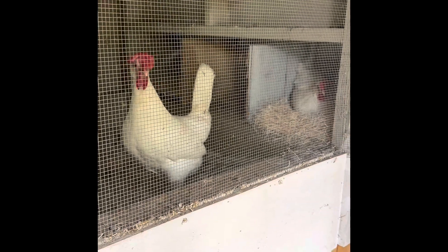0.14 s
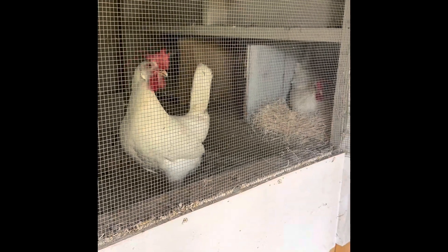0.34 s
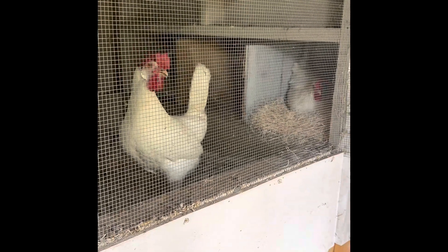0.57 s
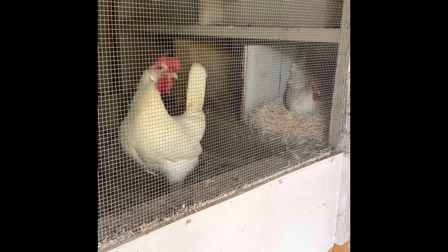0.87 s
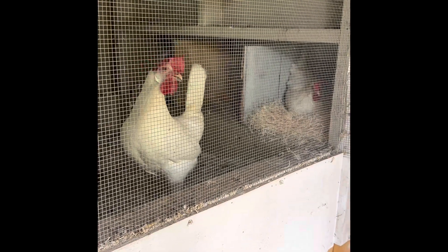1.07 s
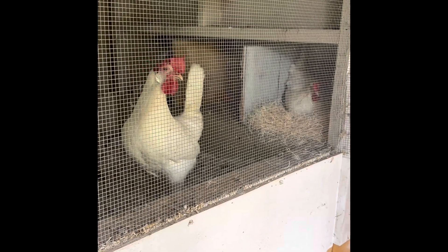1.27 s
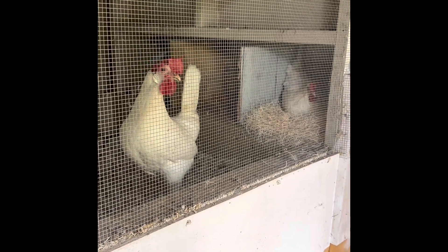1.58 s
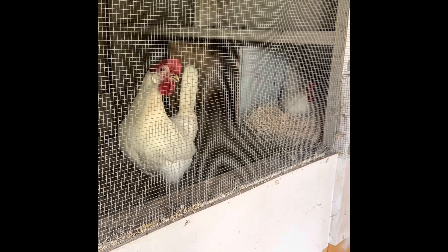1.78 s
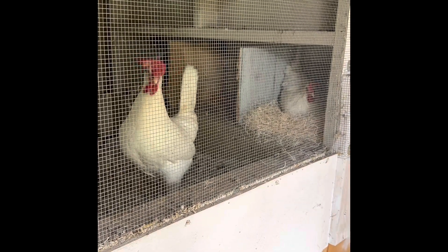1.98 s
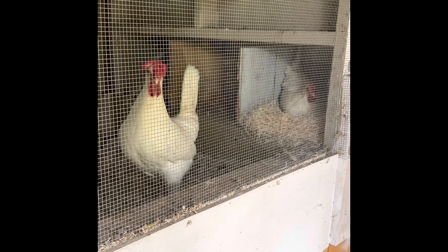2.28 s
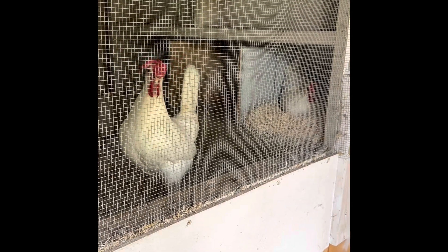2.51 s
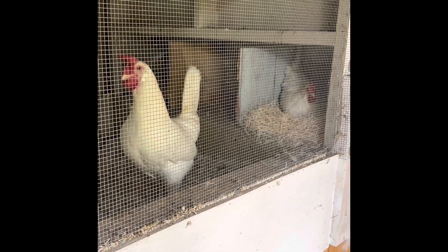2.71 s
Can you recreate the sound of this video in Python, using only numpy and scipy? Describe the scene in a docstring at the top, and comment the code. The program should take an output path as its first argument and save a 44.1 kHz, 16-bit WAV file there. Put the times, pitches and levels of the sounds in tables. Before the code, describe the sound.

Chicken clucking steadily with brief raspy rising notes, close by in a small coop, quiet yard behind.

```python
"""Inside a wooden coop by a quiet yard, a hen clucks in short fast calls, caught in stereo by two microphone ports.
Each cluck is a train of pulses that mostly climbs in pitch and breaks into strong and weak ones, with rasping
noise in every cycle, shaped by throat and beak; the coop walls ring 3 ms behind it, a metre of extra path.
Feet scuff the litter with short scrapes of noise. The yard is filtered noise: air, rustling straw, low rumble.
The two ports differ in level and hear the treble out of step."""
import sys
import numpy as np
from scipy import signal
from scipy.fft import rfft, irfft, next_fast_len
from scipy.io import wavfile
from scipy.ndimage import uniform_filter1d, map_coordinates

SR = 44100
rng = np.random.default_rng(int(sys.argv[2]) if len(sys.argv) > 2 else 0)


def store_wav(level_fs):
    """Save 16-bit WAV to argv[1]."""
    pcm = np.round(np.clip(np.atleast_2d(level_fs), -1, 1) * 32767)
    wavfile.write(sys.argv[1], SR, pcm.T.astype(np.int16))


N = 125685  # samples


def amp(db):
    """Amplitude factor of a level in dB."""
    return 10 ** (np.asarray(db) / 20)


def unit(x):
    """x at an RMS of one."""
    return x / np.sqrt(np.mean(x ** 2) + 1e-20)


def along(points, hz):
    """Read (Hz, value) points on a log frequency axis."""
    f, v = np.transpose(points)
    return np.interp(np.log(hz + 1), np.log(f + 1), v)


def filtered(x, response):
    """x times a complex response of frequency."""
    n = x.shape[-1]
    padded = next_fast_len(n + SR // 4)
    spectrum = rfft(x, padded) * response(np.fft.rfftfreq(padded, 1 / SR))
    return irfft(spectrum, padded)[..., :n]


def pair(size, alike):
    """Two noises whose likeness (correlation) follows frequency, as mid plus and minus side."""
    def mid_and_side(hz):
        turn = np.arccos(np.clip(along(alike, hz), -1, 1)) / 2
        return np.array([np.cos(turn), np.sin(turn)])

    mid, side = filtered(rng.standard_normal((2, size)), mid_and_side)
    return np.array([mid + side, mid - side])


# Colour of the yard air. Each row: frequency in Hz, relative density in dB per Hz.
AIR_COLOUR = [(100, -38), (258, -10.5), (742, -9), (1210, -3), (1630, -30.5), (3040, -24.5), (5090, -43),
              (6330, -34.5), (8300, -55), (10600, -61), (16400, -33.5)]
# Level of the air before its waver. Each row: time in seconds, level in dB.
AIR_LEVEL = [(0, -58), (.25, -55.5), (.5, -59.5), (.75, -58), (1.0, -65.5), (1.3, -56.5), (1.7, -61.5),
             (1.95, -53.5), (2.2, -55), (2.45, -62.5), (2.85, -56.5)]
# Likeness of the yard at the two ports. Each row: frequency in Hz, correlation.
YARD_LIKENESS = [(100, .995), (300, .85), (1500, .6), (8000, .5)]
# Low rumble. Each row: time in seconds, level in dB.
RUMBLE_LEVEL = [(0.0, -54), (0.04, -70.5), (0.13, -55.5), (0.24, -67), (0.55, -68.5), (0.65, -61),
                (0.72, -73), (1.44, -71.5), (1.75, -60.5), (1.88, -69.5), (1.94, -64.5), (2.69, -66),
                (2.78, -58.5), (2.85, -61.5)]
# Colour of the rumble. Each row: frequency in Hz, relative density in dB per Hz.
RUMBLE_SPECTRUM = [(15, -23), (30, -12.5), (55, 4), (110, -0.5), (200, -7), (400, -42.5)]
# Swells of straw. Each row: centre in seconds, half length (Gaussian sigma) in seconds, level in dB.
STRAW_SWELLS = [(1.057, 0.046, -62.5), (1.54, 0.075, -66.5), (1.745, 0.048, -69), (1.902, 0.04, -60),
                (2.15, 0.034, -78)]
# Colour of litter, in rustles and scuffs. Each row: frequency in Hz, relative density in dB per Hz.
LITTER_COLOUR = [(300, 6), (600, -28.5), (1200, -7.5), (3200, -7), (5000, -13), (9000, -8.5), (12000, -19),
                 (16000, -18.5)]
WAVER_DB, WAVER_HZ = 1.5, 8  # spread, and random points per second


def yard():
    """Quiet outdoor air, soft swells of rustling straw and a low rumble, all filtered noise."""
    t = np.arange(N) / SR

    def noise(colour):
        return unit(filtered(pair(N, YARD_LIKENESS), lambda hz: amp(along(colour, hz))))

    waver = map_coordinates(rng.standard_normal(40), [t * WAVER_HZ])
    swells = sum(amp(db) * np.exp(-.5 * ((t - s) / half) ** 2) for s, half, db in STRAW_SWELLS)
    rumble = noise(RUMBLE_SPECTRUM) * amp(np.interp(t, *np.transpose(RUMBLE_LEVEL)))
    air = noise(AIR_COLOUR) * amp(np.interp(t, *np.transpose(AIR_LEVEL)) + WAVER_DB * waver)
    return air + noise(LITTER_COLOUR) * swells + rumble


LITTER_LOW_HZ = 450  # nothing below this in a scuff


def scuff(db, t60):
    """A short scrape of litter: noise whose level jumps every 30 samples like grit, dying away."""
    t = np.arange(SR // 5) / SR
    steps_db = 2.5 * rng.standard_normal(len(t) // 30 + 1).repeat(30)[:len(t)]
    grit = rng.standard_normal(len(t)) * amp(steps_db)
    scrape = filtered(grit, lambda hz: amp(along(LITTER_COLOUR, hz)) * (hz > LITTER_LOW_HZ))
    return unit(scrape) * amp(db - 60 * t / t60)


# Ringing of the coop walls. Each row: frequency in Hz, time to fall 60 dB in seconds.
COOP_T60 = [(300, 0.14), (800, 0.13), (1250, 0.18), (1700, 0.19), (2600, 0.11), (3400, 0.13), (5000, .17),
            (6400, 0.15), (9000, 0.14), (14000, 0.096)]
# Strength of the echo. Each row: frequency in Hz, level in dB relative to the direct sound.
COOP_LEVEL = [(300, 2.5), (800, -2.5), (1250, -2.5), (1700, -10.5), (2600, -3.5), (3400, -5.5), (5000, -5),
              (6400, -2), (9000, -4.5), (14000, -12.5)]
# Likeness of the echo at the two ports. Each row: frequency in Hz, correlation.
COOP_LIKENESS = [(250, .93), (800, .4), (2500, .25), (8000, .5)]
COOP_DELAY_S = .003
FAR_T60_S, FAR_DB = 0.59, -26  # slower answer of the yard, relative to the start of the coop's


def coop(x):
    """The walls answer, each frequency dying at its own speed, with the yard's slower tail beneath."""
    hz, t, z = signal.stft(pair(SR // 2, COOP_LIKENESS), SR, nperseg=256)
    walls = amp(-60 * t / along(COOP_T60, hz)[:, None])
    far = amp(FAR_DB - 60 * t / FAR_T60_S)
    tail = signal.istft(z * (walls + far), SR, nperseg=256)[1]

    def colour(f):
        energy = along(COOP_T60, f) * SR / np.log(1e6)  # of the walls' decay
        return amp(along(COOP_LEVEL, f)) / np.sqrt(energy)

    late = np.pad(x, (round(COOP_DELAY_S * SR), 0))
    return signal.fftconvolve(late[None], filtered(tail, colour), axes=1)


def add(out, x, s, pan_db=0):
    """Mix x and its coop echo into out at s seconds, the left pan_db above the right."""
    i = round(s * SR)
    wet = coop(x)
    wet[:, :len(x)] += x
    out[:, i:i + wet.shape[1]] += wet * amp([[pan_db / 2], [-pan_db / 2]])


# Resonances of windpipe and beak, the main one first, before posture shifts the others.
# Each row: frequency in Hz, width in Hz, level in dB relative to the main one.
THROAT_PEAKS = [(1161.6, 193, 0), (2360, 270, -17.5), (2825, 147, -19), (3476, 184, -17), (4280, 110, -35),
                (6455, 406, -21.5), (7524, 780, -26), (10100, 550, -36.5), (16100, 580, -36.5)]
# Valleys in the voice. Each row: frequency in Hz, width in Hz, depth from 0 to 1.
THROAT_VALLEYS = [(1592, 353, 1), (5240, 2100, 0.84), (11600, 7500, 1)]
# Low resonance while the beak is shut: frequency in Hz, width in Hz, level in dB.
CROP_PEAK = (360, 106, -10.5)
LOW_HZ = 306  # the voice goes dark below this
SHUT_HZ, SHUT_WIDTH_HZ, SHUT_TREBLE_DB = 918, 174, -1  # main resonance and treble with the beak nearly shut


def throat(f, low=1, treble_db=0, top_db=0, scale=1, shut=False):
    """Resonances and valleys of windpipe and beak; low = 1 gives the main resonance, 0 the treble."""
    def peak(centre, width):
        return 1j * f * width / (centre * centre - f * f + 1j * f * width)

    scale = np.clip(scale, .88, 1.12)
    if not low:
        gain_db = treble_db + SHUT_TREBLE_DB * shut
        peaks = 0
        for k, (centre, width, db) in enumerate(THROAT_PEAKS[1:]):
            level = amp(gain_db + db + top_db * (k > 2))  # k > 2: resonances above 4 kHz
            peaks = peaks - (-1) ** k * level * peak(centre * scale, width)
    elif shut:
        peaks = peak(SHUT_HZ, SHUT_WIDTH_HZ) - amp(CROP_PEAK[2]) * peak(*CROP_PEAK[:2])
    else:
        peaks = peak(*THROAT_PEAKS[0][:2])
    dips = np.prod([1 - np.clip(d, 0, 1) * peak(c, w) for c, w, d in THROAT_VALLEYS], axis=0)
    return peaks * dips * (1j * f / (LOW_HZ + 1j * f)) ** 2


OPENS_HZ = (468, 571)  # the beak opens as the pitch climbs through this range
LIMP, UNEVEN = 0.12, 0.74  # what full alternation does to timing (cycles) and to size
JITTER, SCATTER_DB = .02, 1.2  # random spread of pulse timing (cycles) and of pulse level
RASP, HISS, HISS_HZ = .13, .5, 5000  # noise share at all pitches, extra share above HISS_HZ
ATTACK_S, BRIGHTEN_S, STEADY_S = .004, .012, .014  # voice swells in, its treble later and more evenly
RELEASE_S = 0.0032  # time constant of the dying voice


def pulse_train(cycle, split):
    """One pulse per cycle, alternately strong and weak, early and late, placed between samples."""
    k = np.arange(1, int(cycle[-1]))
    draw = rng.standard_normal((200, 2))[:len(k)]
    flip = np.clip(np.interp(k, cycle, split), 0, 1) * (-1) ** k
    at = np.interp(k + LIMP * flip + JITTER * draw[:, 0], cycle, np.arange(len(cycle)))
    size = amp(SCATTER_DB * draw[:, 1]) * (1 + UNEVEN * flip)
    # each pulse is a windowed sinc of 16 samples
    taps = np.floor(at)[:, None] + np.arange(-7, 9)
    off = taps - at[:, None]
    weights = size[:, None] * np.sinc(off) * np.cos(np.pi * off / 16) ** 2
    train = np.bincount(taps.astype(int).ravel() + 7, weights.ravel(), len(cycle) + 16)
    return train[7:7 + len(cycle)]


def cluck(rows, colour):
    """Uneven pulses at the pitch with rasping noise in each cycle, through an opening beak."""
    s, pitch_hz, level_db, split = np.transpose(rows)
    t = s[0] + np.arange(SR // 5) / SR
    pitch = np.interp(t, s, pitch_hz)
    effort_db = np.interp(t, s, level_db)
    cycle = .5 + np.cumsum(pitch) / SR
    pulses = pulse_train(cycle, np.interp(t, s, split))
    rasp = rng.standard_normal(len(t)) * np.exp(-2.5 * (cycle % 1))  # strongest as each cycle starts
    breath = filtered(unit(rasp), lambda f: RASP + HISS * f ** 2 / (f ** 2 + HISS_HZ ** 2))
    source = unit(pulses) + breath
    swell = np.clip((t - s[0]) / ATTACK_S, 0, 1)
    release = np.exp(-np.clip(t - s[-1], 0, None) / RELEASE_S)
    # levels refer to the main resonance with the beak open
    full = np.sqrt(np.mean(filtered(source, throat) ** 2))
    source = source * swell * release * amp(effort_db) / full
    opening = np.interp(pitch, OPENS_HZ, [0, 1])
    even = amp(uniform_filter1d(effort_db, round(STEADY_S * SR), mode="nearest") - effort_db)
    bright = even * np.clip((t - s[0]) / BRIGHTEN_S, 0, 1) ** 2
    voice = np.zeros(len(t))
    for share, shut in [(opening, False), (1 - opening, True)]:
        voice += filtered(source * share, lambda f: throat(f, 1, *colour, shut))
        voice += filtered(source * share * bright, lambda f: throat(f, 0, *colour, shut))
    return voice


# The calls, one curve per cluck.
# Each row: time in seconds, pitch in Hz, level in dB, alternation of strong and weak pulses from 0 to 1.
CLUCK_CURVES = [
    [(.061, 424.6, -26.5, 0), (.075, 466.3, -21, 0.6), (.080, 584.6, -14, 0), (.092, 609.3, -22, 0.98),
     (.105, 666, -21, 1)],
    [(.309, 484, -21, 0), (.317, 587.7, -18.5, 0.75), (.328, 623.8, -10, 0), (.338, 632, -24.5, 0.37),
     (.347, 664, -18.5, 1)],
    [(.556, 432.7, -25.5, 0), (.567, 572.5, -20.5, 0.8), (.575, 584.5, -18.5, 0), (.584, 684, -17.5, 1),
     (.597, 628.4, -17, 0)],
    [(.807, 458, -34.5, 0), (.821, 592.5, -15, 0.6), (.831, 610, -23.5, 0), (.836, 661.4, -9, 0.17),
     (.847, 603, -26.5, 1)],
    [(1.071, 456.6, -35.5, 1), (1.089, 594.2, -16.5, 1), (1.096, 608.3, -19.5, .4),
     (1.102, 612.7, -23.5, 0), (1.116, 669, -19.5, 1)],
    [(1.311, 427.6, -23, 0.6), (1.328, 476.6, -25.5, .15), (1.333, 605.5, -17.5, 0.63),
     (1.343, 672, -16.5, 0.17), (1.357, 604, -32, 1)],
    [(1.542, 422.3, -35.5, 0), (1.557, 473.5, -19.5, 0.5), (1.564, 589, -18, 0.75),
     (1.572, 603.5, -21.5, 0.3), (1.594, 658, -26, 0.4)],
    [(1.751, 286.4, -37.5, .1), (1.768, 357, -32.5, 0), (1.776, 410.5, -27, .2), (1.788, 404.7, -29, 0),
     (1.798, 398.3, -48, 0.3), (1.806, 413, -37, 0), (1.848, 410.3, -52, 0)],
    [(1.940, 375, -62, 0), (1.960, 416, -53.5, 0.43), (1.978, 428, -55, 0.1)],
    [(1.982, 317, -36, 0.4), (2.003, 471.5, -19.5, 0.6), (2.014, 603, -16.5, 0.7), (2.027, 647, -16.5, 0),
     (2.037, 598, -47, 1)],
    [(2.193, 405.7, -42, 0), (2.206, 457.8, -29.5, 0.17), (2.216, 574.3, -18.5, 0.86),
     (2.230, 655.8, -14.5, 0.31), (2.248, 629, -26.5, 0.9)],
    [(2.487, 466.7, -19.5, 0.3), (2.500, 584.5, -21, 0.4), (2.511, 661.7, -10.5, 0), (2.522, 656, -16.5, 1),
     (2.536, 616, -20, 0)],
    [(2.734, 402.3, -25, 0), (2.747, 640, -21.5, 0.7), (2.758, 604.8, -14, 0.48), (2.770, 678.3, -16, 0.3),
     (2.783, 635, -19, .45)],
]
# Posture, one row per cluck. Each row: treble in dB, more above 4 kHz in dB,
# scale of the upper resonances (before its limits), left over right in dB.
POSTURES = [(-1, -5, 0.997, 0), (-6.5, 4.7, 1.044, 0), (-3.8, -1.5, 1.023, 0), (-1.5, -8, 1.02, -0.2),
            (-4, -0.5, 0.992, .3), (-4.2, -8, 0.994, 0.2), (-3, -1, 0.979, 0.8), (2.3, -4, 0.59, 0.6),
            (-4, 6, 1.5, 8), (-8.5, .3, 1.032, -0.1), (-5.5, -4.5, 1.037, 0.5), (-4.5, -8, 1.015, 0.5),
            (-5.7, -5, 1.005, 1.5)]
# Feet in the litter. Each row: start in seconds, starting level in dB, time to fall 60 dB in seconds.
FOOT_SCUFFS = [(.510, -63, 0.013), (1.712, -46, 0.058), (1.761, -48, 0.035), (1.897, -44.5, 0.099)]


def scene():
    """Clucks and scuffs ringing in the coop, over the yard."""
    out = np.zeros((2, N + SR))
    for rows, (*colour, pan_db) in zip(CLUCK_CURVES, POSTURES):
        add(out, cluck(rows, colour), rows[0][0], pan_db)
    for s, db, t60 in FOOT_SCUFFS:
        add(out, scuff(db, t60), s)
    return out[:, :N] + yard()


# Phase between the two ports. Each row: frequency in Hz, lead of the left in radians.
PORT_LEAD = [(0, 0), (860, 0.5), (1120, -0.2), (2410, 0.3), (3190, -0.4), (3620, -0.0), (4570, 0.2),
             (5680, -0.2), (6120, -0.6), (9470, -2.5), (10300, -3.1), (14700, -3.3), (15600, -4.3),
             (16100, -5.4)]
# Balance of the two ports. Each row: frequency in Hz, left over right in dB.
PORT_BALANCE = [(60, 0.0), (110, 0.0), (200, 0.5), (380, 0.5), (700, 4.0), (1290, 2.0), (2380, 1.0),
                (4400, -1.5), (8120, 0.0), (15000, 0.0)]
TOP_HZ, EDGE_HZ = 15950, 200  # band limit, and width of the slope below it


def record(dry):
    """Each microphone port has its own level and phase; nothing is kept above the band limit."""
    def ports(hz):
        half = amp(along(PORT_BALANCE, hz) / 2) * np.exp(.5j * along(PORT_LEAD, hz))
        edge = np.sin(np.pi / 2 * np.clip((TOP_HZ - hz) / EDGE_HZ, 0, 1)) ** 2
        return np.array([half, 1 / half]) * edge

    return filtered(dry, ports)


dry = scene()
out = record(dry)
store_wav(out)
```